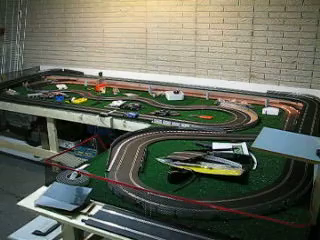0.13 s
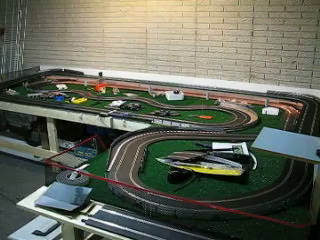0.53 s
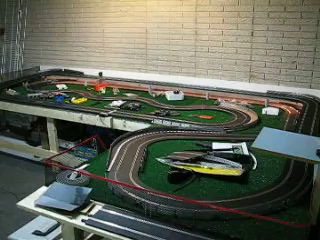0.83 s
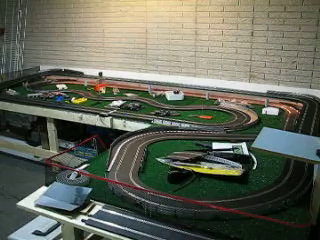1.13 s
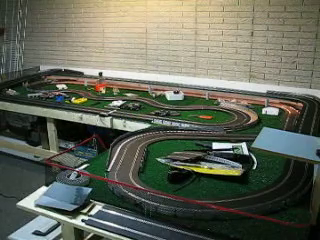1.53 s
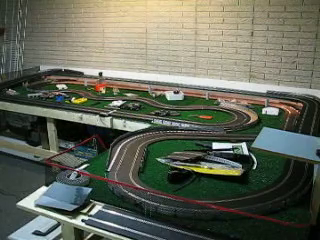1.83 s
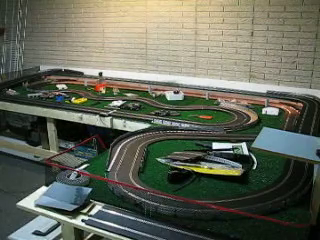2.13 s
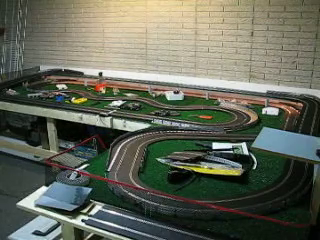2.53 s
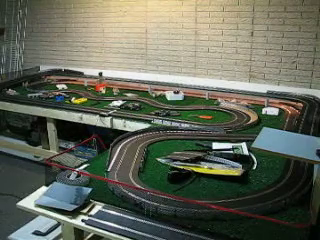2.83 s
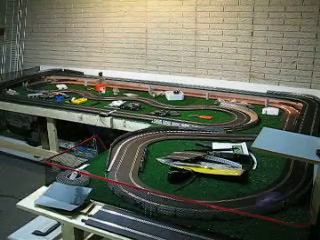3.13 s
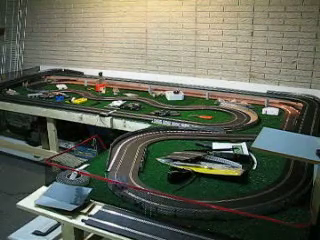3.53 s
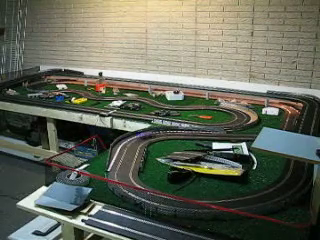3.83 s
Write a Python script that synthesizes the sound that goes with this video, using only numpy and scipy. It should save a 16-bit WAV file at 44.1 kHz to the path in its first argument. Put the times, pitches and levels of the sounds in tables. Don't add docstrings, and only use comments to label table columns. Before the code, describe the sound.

A small electric slot car laps a tabletop track in a brick room. Faint air, hum and a thin high whistle precede a soft controller click at 0.3 seconds. From 0.4 the gear whine and hiss climb, dip near 1.0, rise unevenly, peak around 2.2, drop, surge again near 3.0, dip at 3.2, then continue moderately to 4.0. Sharp joint clacks, low table drumming and brief squeals accompany it.

```python
import sys
import numpy as np
from scipy import signal
from scipy.fft import rfft, irfft
from scipy.io import wavfile
from scipy.ndimage import uniform_filter1d

SR = 44100
rng = np.random.default_rng(int(sys.argv[2]) if len(sys.argv) > 2 else 0)


def to_wav(sig):
    pcm = np.clip(np.atleast_2d(sig), -1, 1) * 32767
    pcm = np.round(pcm).astype(np.int16)
    wavfile.write(sys.argv[1], SR, pcm.T)


def nominal_scale(level):
    x = np.asarray(level, float) / 20
    return 10 ** x


N = 4 * SR

# (frequency [Hz], width [Hz], level [dB])
PANELS = [(1037, 92, 2), (1450, 160, 0.5), (2454, 39, 4.5), (3283, 730, 4.5), (5600, 133, 5.5),
          (7670, 1500, 2)]
# (frequency [Hz], likeness [0-1])
LIKENESS = [(60, 1), (250, .98), (500, 0.97), (1000, 0.87), (2000, 0.76), (4000, 0.19), (8000, 0.18),
            (15000, 0.98)]


def evened(x):
    return x / np.sqrt(np.mean(x ** 2) + 1e-20)


def read(points, hz):
    f, value = np.transpose(points)
    return np.interp(np.log(hz + 1), np.log(f + 1), value)


def peaks_db(peaks, hz):
    return sum(db / (1 + (2 * (hz - f) / width) ** 2) for f, width, db in peaks)


def coloured(x, shape_db):
    hz = np.fft.rfftfreq(x.shape[-1], 1 / SR)
    return irfft(rfft(x) * nominal_scale(shape_db(hz)), x.shape[-1])


def pair(a, b, same):
    same = np.clip(same, -1, 1)
    return np.array([a, same * a + np.sqrt(1 - same ** 2) * b])


def patchy(shape_db, patchy_db, flicker_db, streak_db=0):
    frames, hz = N // 128 + 5, np.fft.rfftfreq(512, 1 / SR)
    a, b, c, d, patch, streak = rng.standard_normal((frames, 257, 6)).T
    streak = evened(uniform_filter1d(uniform_filter1d(streak, size=2, axis=0), size=30, axis=1))
    patch = evened(uniform_filter1d(uniform_filter1d(patch, size=7, axis=0), size=18, axis=1))
    flicker = evened(uniform_filter1d(rng.standard_normal(frames), size=8))
    gain_db = patchy_db * patch + streak_db * streak + flicker_db * flicker
    z = pair(a + 1j * b, c + 1j * d, read(LIKENESS, hz)[:, None]) * nominal_scale(gain_db)
    noise = signal.istft(z, nperseg=512, noverlap=384)[1][:, :N]
    return evened(coloured(noise, shape_db))


def room(x):
    # (frequency [Hz], 60 dB decay time [s])
    decay_times = [(100, 0.18), (1000, 0.44), (8000, 0.24)]
    direct_db, echo_db, size = -1.5, -5, SR // 2
    taps = rng.choice([-1., 1.], (2, size)) * (rng.random((2, size)) < .06)
    taps = taps * (np.arange(size) > 300)
    hz, t, z = signal.stft(taps, SR, nperseg=256)
    decay = nominal_scale(-60 * t / read(decay_times, hz)[:, None])
    tail = signal.istft(pair(*z, read(LIKENESS, hz)[:, None]) * decay, SR, nperseg=256)[1]
    echoes = signal.fftconvolve(x, tail / np.linalg.norm(tail[0]), axes=1)[:, :N]
    return nominal_scale(direct_db) * x + nominal_scale(echo_db) * echoes


def room_air():
    # (frequency [Hz], level [dB])
    air_colour = [(30, -2), (120, 11.5), (300, 8), (900, -2), (1500, -11), (8000, -12), (10000, -14.5),
                  (15500, -20)]
    return nominal_scale(-54) * patchy(lambda hz: read(air_colour, hz), patchy_db=1, flicker_db=.5)


def steady_tones():
    # (frequency [Hz], level [dB])
    lines = [
        (59, -55),
        (823.6, -61),
        (8222, -69),
        (8262, -54.5),
        (8305, -69),
    ]
    t = np.arange(N) / SR
    return sum(nominal_scale(db + 1.5) * np.sin(2 * np.pi * (hz * t + rng.random())) for hz, db in lines)


def knocks():
    # (time [s], peak level [dB], thump level [dB])
    trigger = [
        (.3, -41, -42),
        (.328, -41, -33),
    ]
    # (time [s], peak level [dB], table thump level [dB])
    joints = [(0.4959, -22, -49), (0.819, -8, -16.5), (1.1848, -9, -34), (1.3892, -17, -51),
              (1.4135, -5, -27), (1.4536, -11.5, -31), (1.5682, -8, -20.5), (1.794, -10, -18),
              (1.983, -15, -37), (2.0495, -10, -42), (2.1437, -2.5, -46), (2.2222, -9, -45),
              (2.4736, -5.5, -45), (2.4997, -7.5, -26.5), (2.5956, -3, -32), (3.1059, -6, -40),
              (3.1894, -4, -37), (3.4567, -15, -45), (3.479, -10, -40), (3.62, -7, -32), (3.7461, -5, -32),
              (3.9035, -6.5, -52)]
    # (frequency [Hz], level [dB])
    tick_colour = [(300, -23), (1500, 5), (3500, -1), (7000, 4.5), (10000, -5.5), (15000, -24)]
    tick_t60_s, tick_trim_db = 0.042, -5
    thump_hz, thump_t60_s, thump_trim_db = 373, 0.15, -7.5
    size = 4096
    t, out = np.arange(size) / SR, np.zeros((2, N + size))
    for s, tick_db, thump_db in joints + trigger:
        a, b, c = rng.standard_normal((3, size))
        tick = evened(coloured(pair(a, b, 0.69), lambda hz: read(tick_colour, hz) + peaks_db(PANELS, hz)))
        tick *= np.minimum(t / 0.0029, 1) * nominal_scale(tick_db + tick_trim_db - 60 * t / tick_t60_s)
        thump = evened(coloured(c, lambda hz: -14 * np.log2((hz + 1) / thump_hz) ** 2))
        thump *= np.minimum(t / 0.012, 1) * nominal_scale(thump_db + thump_trim_db - 60 * t / thump_t60_s)
        out[:, round(s * SR):][:, :size] += tick + thump
    return room(out[:, :N])


def flexes():
    # (time [s], length [s], frequency [Hz], level [dB])
    swells = [
        (0.323, 0.048, 125, -48),
        (0.577, 0.15, 125, -43),
        (0.815, 0.054, 128.4, -40),
        (1.25, .2, 109.7, -50),
        (1.919, 0.098, 75, -36),
        (2.329, .1, 120, -41),
        (2.94, 0.071, 281, -36.5),
        (3.03, .07, 100, -46),
        (3.81, .06, 120, -43),
    ]
    t, out = np.arange(N) / SR, 0
    for s, length, hz, db in swells:
        swell = np.sin(np.pi * np.clip((t - s) / length, 0, 1))
        out = out + nominal_scale(db - 1.5) * swell * np.sin(2 * np.pi * hz * t)
    return out


def chassis_db(hz):
    # (frequency [Hz], level [dB])
    shell = [(290, -26), (500, -41), (748, -6.5), (1450, -2.5), (2500, -3), (2970, -9.5), (7230, -2),
             (12700, -28.5), (15500, -41.5)]
    # (frequency [Hz], width [Hz], level [dB])
    sheen = (12600, 1800, 6)
    return read(shell, hz) + peaks_db(PANELS + [sheen], hz)


def whine(mesh_hz):
    harmonics = [0, -6, -6]
    # (frequency [Hz], level [dB])
    gearbox = [(800, -14), (1100, -3), (2000, 1), (2600, -6), (3000, -17), (4500, -14), (5200, 4),
               (7600, 5)]
    width_hz, crown_teeth, wobble = 110, 27, .4
    chatter_db, chatter_size = 2.5, 450
    coasting_db, top_hz = -9, 8000
    turns, out = np.cumsum(mesh_hz) / SR, 0
    coasting = uniform_filter1d((np.gradient(mesh_hz) * SR < -2000) * 1., size=800)
    for k, db in enumerate(harmonics, 1):
        hz = k * mesh_hz
        r = np.exp(-np.pi * k * width_hz / SR)
        a, b, c, d = signal.lfilter([1], [1, -2 * r, r * r], rng.standard_normal((4, N)))
        fuzz = pair(0.78 + evened(a) + 1j * evened(b), evened(c) + 1j * evened(d), read(LIKENESS, hz))
        chatter = uniform_filter1d(rng.standard_normal(N), chatter_size)
        chatter = evened(uniform_filter1d(chatter, chatter_size))
        gain_db = db + read(gearbox, hz) + peaks_db(PANELS, hz) + chatter_db * chatter
        gain_db += (k > 1) * coasting_db * coasting - np.maximum(hz - top_hz, 0) / 100
        out = out + nominal_scale(gain_db) * (fuzz * np.exp(2j * np.pi * k * turns)).real
    return evened(out * (1 + wobble * np.cos(2 * np.pi * turns / crown_teeth)))


def car():
    # (time [s], gear mesh [Hz], hiss level [dB], whine over hiss [dB], drumming over hiss [dB])
    launch = [(.4, 1177, -58.5, -12, 2), (.46, 1250, -46.5, -15, -14), (.52, 1392, -37, -5, -6.5),
              (.61, 1450, -25.5, 0, -15), (.72, 2050, -21, -6, -15.5), (.79, 2317, -23.5, -3.5, -19.5),
              (.9, 1407, -23, -1.5, -19), (.97, 850, -31.5, 2, -12), (1.04, 855, -36.5, 0, -11)]
    esses = [(1.1, 1040, -30.5, -6, -16), (1.15, 1132, -30, -6, -16), (1.2, 1460, -26.5, 2, -15),
             (1.36, 1400, -25.5, -5.5, -12), (1.42, 1354, -28, -17, -14.5), (1.48, 1405, -29.5, -18, -11),
             (1.521, 1546, -29, -5.5, -7.5), (1.63, 1469, -25.5, -1.5, -11.5),
             (1.75, 1317, -27.5, -6, -4.5)]
    straight = [(1.8, 1490, -23.5, -4, -3.5), (1.9, 2170, -21, -35, -8.5), (1.98, 2570, -19.5, -4, -6.5),
                (2.1, 2850, -20.5, -9.5, -9.5), (2.2, 3155, -20.5, -0.5, -4.5),
                (2.27, 2262, -21.5, -7.5, -10), (2.35, 1895, -24, -11, -9.5), (2.42, 1322, -30, -4, -5.5)]
    ramp = [(2.47, 1450, -27, -17, -14.5), (2.62, 1267, -24, -15, -10.5), (2.7, 1265, -27, -16, -8.5),
            (2.781, 1450, -25.5, -2, -8.5), (2.91, 2130, -20.5, -6, -8), (3.04, 2550, -21.5, -10, -13.5),
            (3.09, 2448, -24, -22, -10), (3.13, 1986, -22.5, 4.5, -14), (3.19, 1399, -23, -7.5, -13),
            (3.22, 1121, -33, 2, -8)]
    hairpin = [(3.301, 1082, -29.5, 2, -11.5), (3.47, 1113, -27.5, 1.5, -10), (3.52, 1234, -24, -17, -17),
               (3.641, 1303, -23, -4, -14.5), (3.7, 1491, -23, -0.5, -13.5),
               (3.8, 1550, -21.5, -5.5, -17.5), (3.87, 1399, -23, -4, -16.5), (4, 1290, -25.5, -4.5, -13)]
    # (frequency [Hz], level [dB])
    table_colour = [(40, -71), (70, -5.5), (150, -8), (300, -6.5), (480, 2.5), (1000, -0.5), (2500, -5.5),
                    (5000, -29)]
    # (frequency [Hz], width [Hz], level [dB])
    boards = [(120, 8.8, 4.5), (274.5, 33, 5.5), (383, 50, 3.5), (483, 8.3, 3.5)]
    s, *controls = np.transpose(launch + esses + straight + ramp + hairpin)
    t = np.arange(N) / SR
    mesh_hz, hiss_db, whine_db, drum_db = (np.interp(t, s, c) for c in controls)
    hiss = nominal_scale(2.5) * patchy(chassis_db, patchy_db=1., flicker_db=.8, streak_db=2.5)
    drum = patchy(lambda hz: read(table_colour, hz) + peaks_db(boards, hz), patchy_db=1.2, flicker_db=1.2)
    gears = room(nominal_scale(hiss_db + whine_db) * whine(mesh_hz))
    return nominal_scale(hiss_db) * (hiss + nominal_scale(drum_db) * drum) + gears


def squeals():
    # (time [s], length [s], start frequency [Hz], end frequency [Hz], level [dB])
    songs = [(0.617, 0.12, 1695, 1700, -30), (0.718, .1, 6670, 7090, -20.5),
             (0.812, 0.046, 6300, 5500, -26), (0.958, 0.14, 1515, 1725, -34.5),
             (1.044, 0.012, 1680, 1690, -23), (1.08, 0.046, 1957, 1954, -29.5),
             (1.11, 0.027, 1084, 1084, -32), (1.22, .28, 2440, 2440, -33), (1.266, .07, 7250, 7600, -29),
             (1.403, 0.031, 2392, 2440, -21.5), (1.441, 0.035, 7500, 7500, -27.5),
             (1.507, 0.078, 1577, 1521, -40), (1.58, 0.13, 7126, 7600, -30), (1.888, .08, 6800, 7100, -22),
             (1.95, 0.06, 4880, 5300, -25), (1.982, .06, 7360, 7950, -22), (2.02, .07, 5450, 5600, -31),
             (2.137, 0.031, 2732, 2500, -23.5), (2.218, 0.0545, 5340, 5600, -23),
             (2.25, .06, 7100, 6030, -18.5), (2.601, .16, 2500, 2500, -32),
             (2.789, 0.066, 3003, 3436, -29.5), (2.9, .16, 6300, 7710, -29),
             (3.121, 0.066, 2050, 1400, -28), (2.951, 0.059, 2400, 2644, -31), (3.45, 0.24, 841, 838, -38),
             (2.991, .08, 4950, 5380, -28), (3.061, .03, 1400, 1350, -25), (3.441, .24, 2237, 2626, -28),
             (3.81, 0.042, 1500, 1398, -24.5), (2.664, 0.032, 1605, 1607, -32),
             (3.731, 0.046, 2242, 2250, -28), (3.733, 0.059, 3280, 3280, -27)]
    out = np.zeros((2, N))
    for s, length, from_hz, to_hz, db in songs:
        u = np.arange(0, 1, 1 / (length * SR))
        a, b, c, d = uniform_filter1d(rng.standard_normal((15000, 4)), size=300, axis=0).T
        fuzz = pair(0.62 + evened(a) + 1j * evened(b), evened(c) + 1j * evened(d), read(LIKENESS, from_hz))
        turns = np.cumsum(from_hz + (to_hz - from_hz) * u) / SR
        tone = (fuzz[:, :len(u)] * np.exp(2j * np.pi * turns)).real
        out[:, round(s * SR):][:, :len(u)] += nominal_scale(db) * np.sin(np.pi * u) ** .5 * tone
    return room(out)


def scene():
    # (time [s], left minus right [dB])
    place = [(0, 2.5), (.7, 0.5), (1.3, 1.5), (1.8, 1), (2.3, -0.2), (2.8, -0.9), (3.3, 0), (4, 0.6)]
    t = np.arange(N) / SR
    background = (room_air() + steady_tones()) * nominal_scale(-8 * np.clip(1 - t / 0.32, 0, 1))
    side = nominal_scale(np.outer([.5, -.5], np.interp(t, *np.transpose(place))))
    return background + flexes() + side * (knocks() + car() + squeals())


def low_pass(x):
    return signal.sosfilt(signal.butter(12, 15630, fs=SR, output="sos"), x)


def record(dry):
    # (frequency [Hz], left minus right [dB])
    lean = [(60, -1), (380, -.5), (1290, -1.5), (2380, -4), (4400, -0.9), (8500, -4.5), (10500, -9),
            (13000, 11.5)]
    # (frequency [Hz], phase the left port leads by [rad])
    lead = [(500, 0), (2300, -0.47), (4500, -0.05), (8500, 0.74), (9500, 1.5), (12000, 5.5)]
    start_s = 0.035
    halves = [.5, -.5]
    leaning = coloured(dry, lambda hz: np.outer(halves, read(lean, hz)) - np.maximum(hz - 14500, 0) / 35)
    phase = np.outer(halves, read(lead, np.fft.rfftfreq(N, 1 / SR)))
    leaning = irfft(rfft(leaning) * np.exp(1j * phase), N)
    gate = np.clip((np.arange(N) / SR - start_s) * 500, 0, 1)
    return low_pass(leaning * gate)


dry = scene()
out = record(dry)
to_wav(out)
```